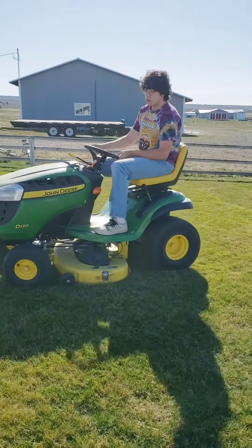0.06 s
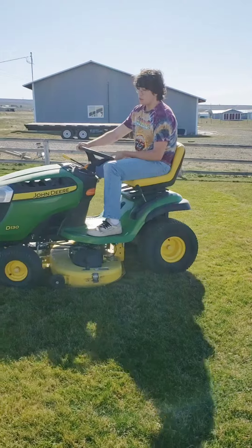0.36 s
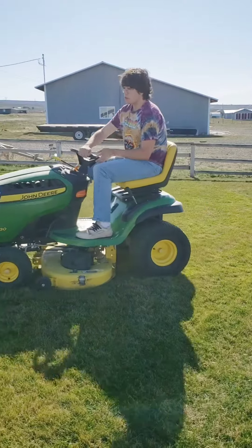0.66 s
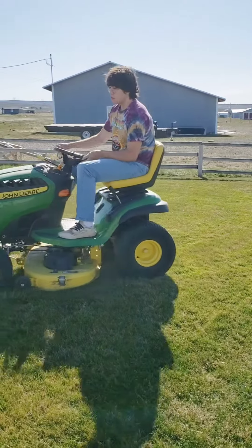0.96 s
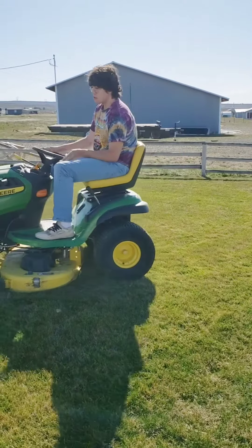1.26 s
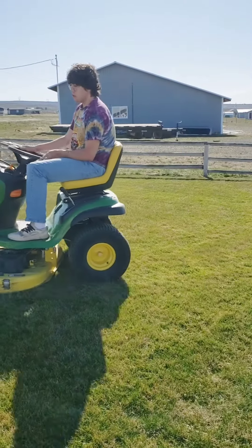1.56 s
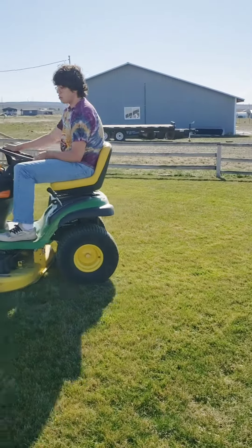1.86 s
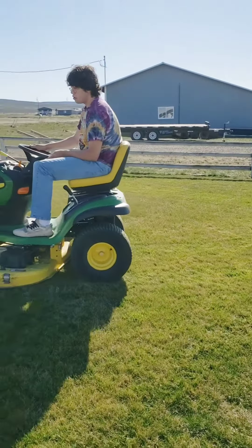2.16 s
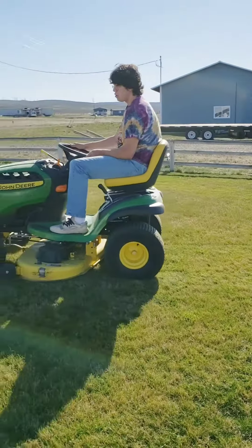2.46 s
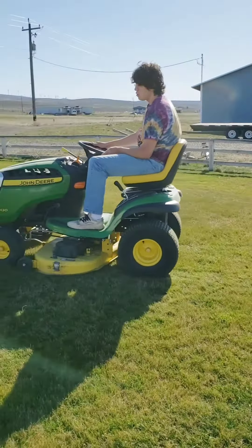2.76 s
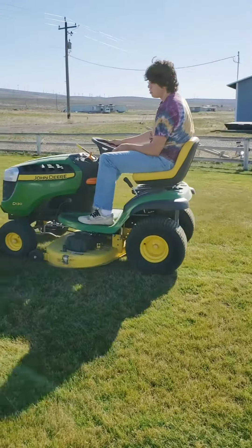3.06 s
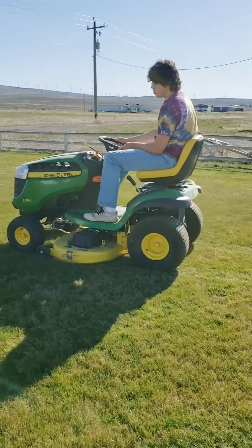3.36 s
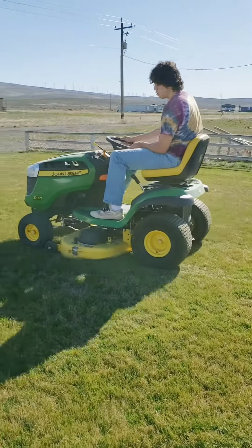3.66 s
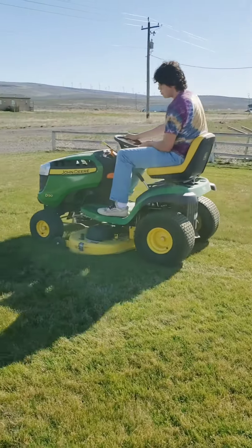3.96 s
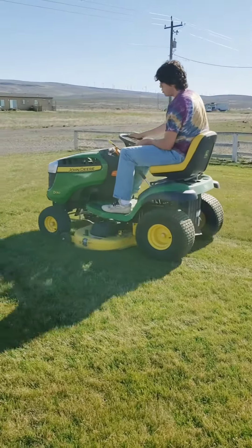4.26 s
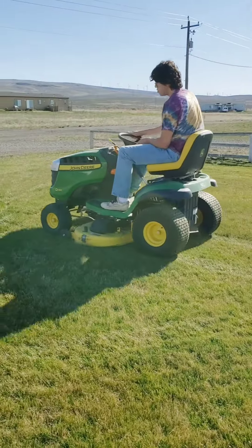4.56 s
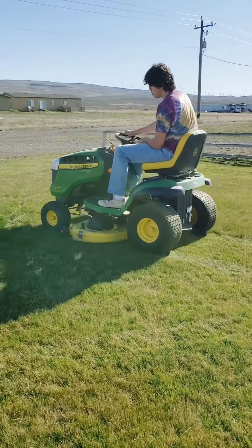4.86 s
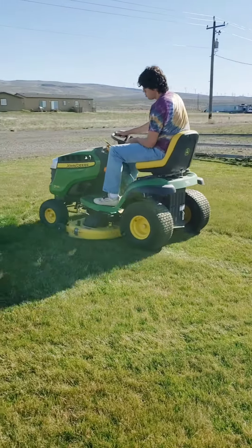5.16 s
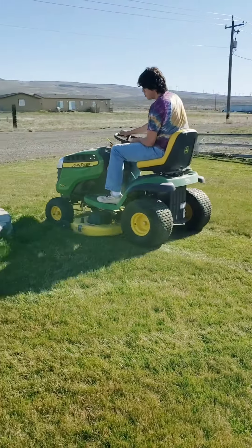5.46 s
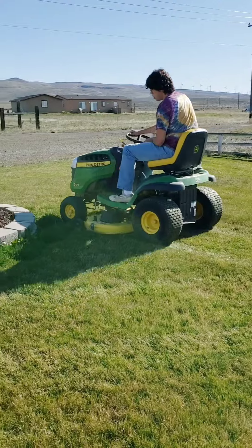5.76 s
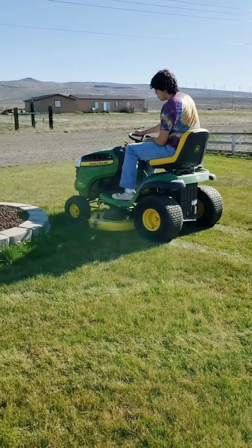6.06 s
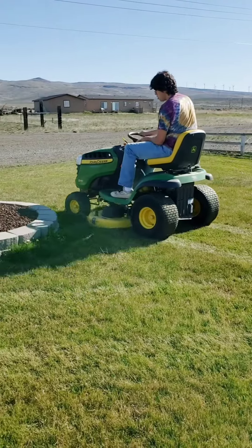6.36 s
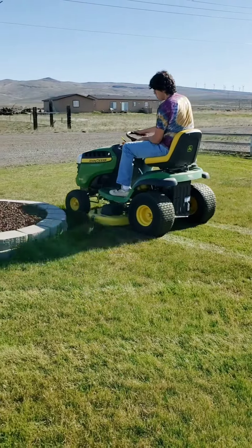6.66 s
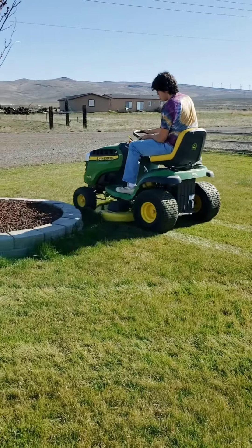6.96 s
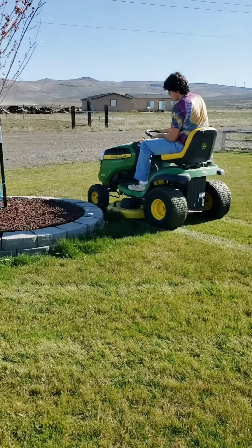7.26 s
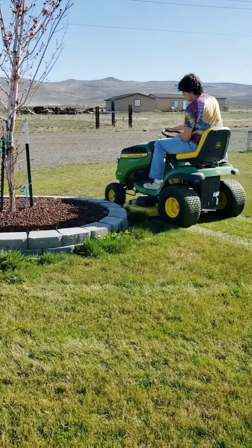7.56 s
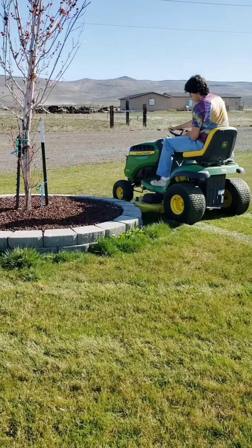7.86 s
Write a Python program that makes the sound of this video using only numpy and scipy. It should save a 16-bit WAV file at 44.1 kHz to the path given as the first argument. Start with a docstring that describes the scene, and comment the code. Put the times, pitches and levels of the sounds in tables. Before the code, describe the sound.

A riding lawn mower drones steadily with whirring blades, passing close by and slowly growing a little quieter as it moves away.

```python
"""A lumpy engine drone beats against the hum of blades: a V-twin riding mower passes on an open lawn,
then turns away. Uneven pressure pulses drive the muffler's harmonics; the belt-driven blades add
a second series. Turbulence makes the deck rumble and roar, the fan whirr and the blade tips hiss,
while vanes and gears whine and the chassis squeaks faintly by stick-slip friction.
Distance lowers the level, and single bands swell or sink for a moment as the mower passes."""
import sys
import numpy as np
from scipy import signal
from scipy.fft import rfft, irfft
from scipy.io import wavfile
from scipy.ndimage import uniform_filter1d, map_coordinates

SR = 44100
rng = np.random.default_rng(int(sys.argv[2]) if len(sys.argv) > 2 else 0)


def digitize_waveform(pressure):
    """Quantize a signal to 16-bit integers and store it at the path in sys.argv[1].

    Rows of a 2-D input are taken as channels; values are limited to [-1, 1].
    """
    field = np.atleast_2d(pressure).T
    bounded = np.clip(field, -1, 1)
    quanta = np.round(bounded * 32767).astype(np.int16)
    wavfile.write(sys.argv[1], SR, quanta)


N = 353682
TIME = np.arange(N) / SR
BIN_HZ = np.maximum(np.arange(N // 2 + 1) * SR / N, 1)


def undb(db):
    """Amplitude ratio of a level in decibels."""
    return 10 ** (np.asarray(db) / 20)


def unit(x):
    """Normalisation to rms 1."""
    return x / np.sqrt(np.mean(x ** 2))


def curve(table):
    """Linear interpolation of (time_s, value) rows at every sample."""
    return np.interp(TIME, *np.transpose(table))


def spectra(table):
    """Interpolation of each column over log frequency, one value per bin."""
    hz, *columns = np.transpose(table)
    return np.array([np.interp(np.log(BIN_HZ), np.log(hz), c) for c in columns])


def bell(offset, spread):
    """Gaussian window of height 1."""
    return np.exp(-.5 * (offset / spread) ** 2)


def wander(rate_hz):
    """Low-pass noise of rms 1 that changes about rate_hz times a second."""
    hold = int(SR / rate_hz)
    steps = np.repeat(rng.standard_normal(N // hold + 1), hold)
    return unit(uniform_filter1d(uniform_filter1d(steps, hold), hold)[:N])


def spreading(near_db, doubling_db, nearest_s=0.6, nearest_m=1.92, speed_m_s=0.6):
    """Spreading loss: the level in dB falls by doubling_db per doubling of distance."""
    distance_m = np.hypot(nearest_m, speed_m_s * (TIME - nearest_s))
    return near_db - doubling_db * np.log2(distance_m / nearest_m)


def directivity(lobes):
    """Directivity: gain in dB as the exhaust or deck opening turns past the listener."""
    return sum(db * bell(TIME - centre_s, spread_s) for centre_s, spread_s, db in lobes)


def cavity_lag(hz, centre_hz, width_hz):
    """Phase lag of a driven resonator in radians, taken as zero at resonance."""
    return np.arctan((hz ** 2 - centre_hz ** 2) / (hz * width_hz))


def throb(cycles, phase, depth_db):
    """Amplitude modulation: one swell per engine cycle."""
    return undb(depth_db * np.cos(2 * np.pi * (cycles - phase)))


# Governed engine speed, in four-stroke cycles: time_s, cycle_hz
ENGINE_SPEED = [(0.0, 22.783), (0.22, 22.723), (0.6, 22.889), (1.18, 22.758), (1.85, 22.771),
                (2.26, 23.089), (2.79, 22.769), (2.99, 22.558), (4.49, 22.677), (4.99, 22.919),
                (5.4, 22.765), (5.96, 22.848), (6.24, 22.688), (6.7, 22.627), (7.36, 22.827), (8.0, 22.73)]

def engine_cycles():
    """Phase as the integral of frequency: engine cycles elapsed at each sample."""
    return np.cumsum(curve(ENGINE_SPEED)) / SR


# Main pressure pulses of one cycle, negative for suction, which give the drone its lumpy chug:
# phase_cycles, strength
PRESSURE_PULSES = [(.136, .61), (.527, .46), (.814, -.94), (.947, -1.08)]
# Muffler harmonics: cycle_multiple, relative_db
MUFFLER_HARMONICS = [(1, -44), (2, -12), (3, -10.5), (4, -16), (5, -0.5), (6, -7.5), (7, -8), (8, 0.95),
                     (9, -7.5), (10, -12), (11, -8.5), (12, -27.5), (13, -17), (14, -18.5), (15, -32.5),
                     (16, -19.5), (17, -25), (18, -43), (19, -35), (21, -32.5)]
# Lobes of the exhaust's boom and of its bark: centre_s, spread_s, gain_db
BOOM_LOBES = [(0.2, 0.68, -2.5), (2.45, 0.44, 2), (6.3, 0.38, 1)]
BARK_LOBES = [(.85, 0.26, 4.5), (4.9, 0.73, -5.5), (6.1, 0.34, 2.5)]

def engine_drone(cycles, jitter_cycles=0.00062, right_bias_db=0.77):
    """Fourier series: uneven pressure pulses set the phases, the muffler the levels."""
    pulse_phase, strength = np.transpose(PRESSURE_PULSES)
    cycle_hz = cycles[-1] / TIME[-1]
    angle = 2 * np.pi * (cycles + jitter_cycles * wander(30))
    low_db = spreading(-27, 3.5)  # long waves radiate evenly in all directions
    boom_db = spreading(-29, 2.35) + directivity(BOOM_LOBES)
    bark_db = spreading(-27.5, 4.6) + directivity(BARK_LOBES)
    drone = 0
    for k, db in MUFFLER_HARMONICS:
        coefficient = np.sum(strength * np.exp(-2j * np.pi * k * pulse_phase))
        lag = cavity_lag(k * cycle_hz, centre_hz=65, width_hz=19)
        band_db = low_db if k < 6 else bark_db if 10 <= k < 15 else boom_db
        drone += undb(db + band_db) * np.cos(k * angle + np.angle(coefficient) - lag)
    balance = undb([[-right_bias_db / 2], [right_bias_db / 2]])
    return np.sqrt(2) * drone * undb(0.14 * wander(45)) * balance


# Blade harmonics: spindle_multiple, relative_db
BLADE_HARMONICS = [(2, 2), (3, -13.5), (4, 1.5), (5, -10), (6, -6), (8, -15.5), (10, -17.5)]
# Gain of the blade-passing tone and of its octave: time_s, gain_db
HUM_GAIN = [(0, -36), (0.45, -35), (.9, -32), (1.5, -33.7), (2.15, -32), (2.95, -37), (3.55, -34),
            (4.2, -36), (5.15, -38.5), (5.6, -35.7), (6.2, -42.5), (7.05, -52), (7.5, -36), (8.0, -47)]
OCTAVE_GAIN = [(0.25, -42), (0.7, -34.5), (1.5, -35.5), (2.1, -32.5), (3.05, -34), (3.5, -37.5), (4.1, -33),
               (4.9, -37), (5.5, -40), (6.2, -34), (6.65, -45), (7.4, -60), (7.9, -35)]

def blade_hum(cycles, turns_per_cycle=1.7419, slip_turns=0.0041):
    """Blade-passing tone: two wings pass per spindle turn, on a belt that slips a little."""
    spindle_turns = turns_per_cycle * cycles + .088
    spindle_hz = (spindle_turns[-1] - spindle_turns[0]) / TIME[-1]
    angle = 2 * np.pi * (spindle_turns + slip_turns * wander(2.87))
    firm_db = {2: curve(HUM_GAIN), 4: curve(OCTAVE_GAIN)}
    overtone_db = spreading(-36, 4)
    hum = 0
    for k, db in BLADE_HARMONICS:
        level_db = db + firm_db.get(k, overtone_db)
        flutter_db = (.6 if k in firm_db else 2.5) * wander(6)
        lag = cavity_lag(k * spindle_hz, centre_hz=115, width_hz=60)
        hum += undb(level_db + flutter_db) * np.cos(k * angle - lag)
    return np.sqrt(2) * hum


# Sound field at the two microphone ports: frequency_hz, left_lead_rad, coherence
STEREO_FIELD = [(60, -0.5, 1), (287, 0.43, 0.98), (394, 0.8, 1), (500, 1.5, 0.96), (605, 0.54, 0.9),
                (850, 0.19, 1), (1290, 1.5, 0.75), (1550, 0.31, 0.97), (2390, 1.36, 0.96), (3080, 3, 0.45),
                (4530, 5, 0.33), (6600, 8.5, 0), (14000, 19, 0)]

def radiate(force, body):
    """Source and filter: a body colours the force; scattering lowers stereo coherence in the treble."""
    lead_rad, coherence = spectra(STEREO_FIELD)
    sides = np.array([[1], [-1]])
    direct = np.sqrt(1 + coherence) * rfft(force)
    scattered = np.sqrt(1 - coherence) * rfft(rng.standard_normal(N)) * sides
    low_hz, high_hz = body[0][0], body[-1][0]
    skirts = np.minimum(1, np.minimum(BIN_HZ / low_hz, high_hz / BIN_HZ)) ** 2
    response = skirts * undb(spectra(body)) * np.exp(.5j * lead_rad * sides)
    return unit(irfft((direct + scattered) * response, N))


# Spectral shape of the air under the deck: frequency_hz, left_db, right_db
RUMBLE_SPECTRUM = [(18, -17, -17), (36, -18, -17), (75, -0.5, -1.5), (130, -2.5, -2.5), (225, 3, 5),
                   (301, -4, -1), (397, -16.5, -4), (510, -13, -35), (800, -47, -53)]
# Lobes of the deck opening: centre_s, spread_s, gain_db
RUMBLE_LOBES = [(2.8, 0.7, 0.94), (4.9, 0.91, -0.81), (7.5, 0.32, -0.49)]

def air_rumble(cycles):
    """Turbulence: air churned under the deck makes low noise that throbs with the engine."""
    churn = radiate(rng.standard_normal(N), RUMBLE_SPECTRUM)
    level_db = spreading(-35, 1.34) + directivity(RUMBLE_LOBES)
    return churn * throb(cycles, phase=0.86, depth_db=2) * undb(level_db)


def crank_jolts(cycles, phase=.55, spread_db=2, decay_s=0.0048):
    """Impact excitation: each crank turn, two to a cycle, jolts the loose deck into a noise burst."""
    onsets = np.diff(np.floor(2 * (cycles - phase)), prepend=np.floor(-2 * phase)) > 0
    impulses = onsets * undb(spread_db * np.clip(rng.standard_normal(N), -2, 2))
    envelope = signal.lfilter([1], [1, -np.exp(-1 / (decay_s * SR))], impulses)
    return unit(envelope * rng.standard_normal(N))


def turbulence(cycles, locked_share, renew_s=0.9):
    """Cyclostationary noise: a share of the power repeats each cycle, in a slowly renewed pattern."""
    cycle_samples = int(N / cycles[-1])
    patterns = rng.standard_normal((int(TIME[-1] / renew_s) + 3, cycle_samples))
    position = [TIME / renew_s, cycles % 1 * cycle_samples]
    locked = unit(map_coordinates(patterns, position, order=3, mode="grid-wrap"))
    return np.sqrt(locked_share) * locked + np.sqrt(1 - locked_share) * rng.standard_normal(N)


# Response of the steel deck: frequency_hz, left_db, right_db
DECK_RESPONSE = [(300, -6, -11), (450, -9, -3.5), (569, -1.5, -25), (621, 1.5, -6), (765, 0, -2),
                 (900, 0, -1), (933, -10.5, -0.5), (1207, -4, -7), (1333, -10, -10.5), (1690, -39, -45)]

def deck_roar(cycles, jolts, surge_db):
    """Forced vibration: turbulence and jolts drive the broad resonances of the deck."""
    force = turbulence(cycles, locked_share=0.29) + undb(-9) * jolts
    return radiate(force, DECK_RESPONSE) * undb(spreading(-36, 3.93) + surge_db)


# Response of the cooling fan and engine shroud: frequency_hz, left_db, right_db
SHROUD_RESPONSE = [(1160, -13.5, -22), (1480, 4, -15), (1576, -1, 0.5), (1790, -1, 1.6), (1880, -2, -3.5),
                   (2160, -3.5, 2.5), (2410, -4.5, 0.5), (2584, -8, -8), (3220, -29, -31)]

def fan_whirr(cycles, jolts, surge_db):
    """Flow-induced vibration: cooling air and faint jolts ring the shroud."""
    force = turbulence(cycles, locked_share=0.31) + undb(-13.5) * jolts
    whirr = radiate(force, SHROUD_RESPONSE) * throb(cycles, phase=0.12, depth_db=0.7)
    return whirr * undb(spreading(-41, 2.86) + 0.99 * surge_db + 0.76 * wander(30))


def grit(count=520, low_hz=4000, high_hz=13500, spread_db=2.5, tick_s=.0003, ring_s=.003):
    """Damped free vibration: soil and loose fittings hit steel, from dry ticks to short pings."""
    pings = np.zeros(N)
    t = np.arange(0, .04, 1 / SR)
    for when, pitch, size, ringing in rng.random((count, 4)):
        hz = low_hz + pitch * (high_hz - low_hz)
        size_db = spread_db * min(-np.log(1 - size), 3)  # most are tiny
        decay_s = tick_s * (ring_s / tick_s) ** ringing
        peak = undb(size_db) * np.sqrt(ring_s / decay_s)  # energy is independent of decay time
        span = int(when * (N - len(t))) + np.arange(len(t))
        pings[span] += peak * np.exp(-t / decay_s) * np.sin(2 * np.pi * hz * t)
    return pings


def peaking_filter(x, hz, width_hz, gain_db):
    """A second-order resonator lifts or dips one band."""
    band = signal.lfilter(*signal.iirpeak(hz, hz / width_hz, fs=SR), x)
    return x + (undb(gain_db) - 1) * band


# Spectral shape of air and grass off the blade tips: frequency_hz, left_db, right_db
HISS_SPECTRUM = [(2130, -17, -19), (2860, 0.5, -2), (3580, 1.5, -5.5), (4200, -1.3, -7), (5170, -4.5, -8),
                 (6050, -5, -13), (7000, -9, -47), (8200, -10, -20.5), (9500, -9, -12), (12100, -9, -10.5),
                 (13600, -7.5, -17), (14600, -18, -19)]
# Narrow modes of the sheet steel: centre_hz, width_hz, gain_db
PANEL_MODES = [(3280, 45, 2), (3750, 64, 1.5), (3950, 90, 2.5), (4150, 70, -2.5), (4250, 50, 4),
               (4450, 50, 4), (4780, 50, 2), (5300, 50, 3.5)]

def tip_hiss(cycles, shadow_hz=7500):
    """Aerodynamic noise and grit, coloured by steel; the leaving machine shadows the top most."""
    spray = turbulence(cycles, locked_share=0.11) + undb(-8) * grit()
    air = radiate(spray, HISS_SPECTRUM)
    for hz, width_hz, gain_db in PANEL_MODES:
        air = peaking_filter(air, hz, width_hz, gain_db)
    from_chuff = (cycles - 0.2 + .5) % 1 - .5  # the valve gear chuffs once a cycle
    chuff_db = 1.5 * bell(from_chuff, spread=.08)
    air = unit(air * undb(chuff_db)) * undb(0.58 * wander(15))
    top = signal.sosfiltfilt(signal.butter(2, shadow_hz, "high", fs=SR, output="sos"), air)
    return (air - top) * undb(spreading(-46.5, 2.14)) + top * undb(spreading(-42.5, 3.76))


# Tones of the fan vanes and gears: cycle_multiple, relative_db
WHINE_HARMONICS = [(29, -.5), (32, -5), (34, -2.5), (37, -5), (54, -6.5), (63, -15), (76, -4), (81, -6.5)]

def gear_whine(cycles, flutter_db=3, wobble_rad=0.88):
    """Vane-passing and gear-mesh tones, locked to the crank and fluttering in the moving air."""
    field_hz, lead_rad, _ = np.transpose(STEREO_FIELD)
    cycle_hz = cycles[-1] / TIME[-1]
    whine = 0
    for k, db in WHINE_HARMONICS:
        stereo_rad = np.interp(k * cycle_hz, field_hz, lead_rad) * np.array([[.5], [-.5]])
        gain = undb(db + flutter_db * wander(7))
        angle = 2 * np.pi * (k * cycles + rng.random()) + wobble_rad * wander(12)
        whine += gain * np.cos(angle + stereo_rad)
    return np.sqrt(2) * whine * undb(spreading(-54, 3.3))


# Bands of the mower's drone and roar that swell or sink for a moment as it passes:
# centre_s, spread_s, centre_hz, width_hz, gain_db
BAND_SWELLS = [(2, 1.2, 68, 8, 2), (7, 0.21, 159, 9, 8), (4, 1.9, 182, 12, 0.7), (3, 1.3, 84, 7.6, -4),
               (8, 2.1, 95, 13, 5.5), (5, 2.2, 150, 11, 0.5), (4, 0.64, 205, 5.7, -2),
               (5, 0.29, 1860, 52, 5), (4.85, .45, 630, 90, 2.5), (6.5, 0.81, 250, 16, 1),
               (3.5, 0.41, 280, 34, -1), (10, .5, 228, 14, -5), (2.06, 0.64, 380, 120, 1.5),
               (3.5, 0.75, 368, 30, 4), (1.66, 0.96, 530, 120, 2.5), (4, 0.52, 675, 190, -2.5),
               (1, 0.4, 780, 640, -2.5), (1.5, 0.54, 1100, 1100, 1.7), (1, 0.26, 1740, 77, 0.5),
               (0.7, 0.32, 2040, 490, 2.5), (1.5, 1.5, 2710, 290, 3), (1, 1.1, 3930, 700, -3),
               (2, 1.2, 2075, 130, -7.5), (3.5, 1.6, 1110, 260, 2), (2, 0.37, 2400, 93, 1),
               (3.5, 1.5, 1850, 42, 5), (2.5, 0.21, 8700, 6500, 0.3), (5, 1, 1600, 47, 5.5),
               (7, 0.77, 4500, 120, 5.5), (6.2, 1.4, 2730, 350, -3), (3, 0.5, 600, 150, -2.5),
               (3.5, 0.64, 316, 50, 2), (0.5, .25, 1850, 64, 3), (8.5, .4, 690, 270, -1),
               (0, 0.4, 860, 500, -2), (6.5, 0.36, 340, 93, 2.5), (4.5, 0.22, 220, 12, -3),
               (0, .5, 137, 12, 1), (4, 1, 150, 12, 0.2), (7, 1, 1305, 150, -3), (7.2, 2, 1430, 58, 6.5)]

def swell_bands(x):
    """Time-varying filtering: each band swells or sinks for a moment, shifting the timbre."""
    for centre_s, spread_s, hz, width_hz, gain_db in BAND_SWELLS:
        x = peaking_filter(x, hz, width_hz, gain_db * bell(TIME - centre_s, spread_s))
    return x


# Squeaks of the seat and linkage: centre_s, pitch_hz, tone_db, scrape_db
SQUEAKS = [(.608, 8270, -60, -53), (.705, 8950, -55, -50), (.737, 5250, -57, -53), (.93, 3500, -60, -51),
           (1.281, 5510, -51, -55), (1.457, 7900, -56, -48.5), (1.634, 3160, -50, -51),
           (2.408, 3380, -52, -54), (2.651, 5130, -42.5, -49), (2.685, 8270, -54, -55),
           (2.84, 5500, -58, -62), (3.035, 5350, -55, -60), (3.32, 3900, -58, -49), (3.892, 5170, -48, -56),
           (3.965, 2700, -53, -56), (4.198, 5080, -51, -52), (4.255, 6290, -57, -55),
           (4.609, 12660, -58, -60)]

def chassis_squeaks(waver_hz=40, spread_s=.0095):
    """Stick-slip friction: short wavering tones, each with a dry scrape."""
    squeaks = np.zeros((2, N))
    t = np.arange(-.04, .04, 1 / SR)
    swell = bell(t, spread_s)
    detune_hz = waver_hz * wander(390)
    scrape_band = signal.butter(2, [2900, 9000], "band", fs=SR, output="sos")
    scrape = unit(signal.sosfilt(scrape_band, rng.standard_normal((2, N))))
    for centre_s, pitch_hz, tone_db, scrape_db in SQUEAKS:
        span = int((centre_s + t[0]) * SR) + np.arange(len(t))
        tone = np.sin(2 * np.pi * np.cumsum(pitch_hz + detune_hz[span]) / SR)
        squeaks[:, span] += swell * (undb(tone_db) * tone + undb(scrape_db) * scrape[:, span])
    return squeaks


def scene():
    """Superposition of the mower's sources, all but the squeaks timed by the engine cycle."""
    cycles = engine_cycles()
    drone = engine_drone(cycles)
    hum = blade_hum(cycles)
    rumble = air_rumble(cycles)
    surge_db = 0.64 * wander(13)  # bumps in the lawn shake deck and shroud together
    jolts = crank_jolts(cycles)
    roar = deck_roar(cycles, jolts, surge_db)
    whirr = fan_whirr(cycles, jolts, surge_db)
    hiss = tip_hiss(cycles)
    whine = gear_whine(cycles)
    return hum + swell_bands(drone + rumble + roar + whirr + hiss + whine) + chassis_squeaks()


def record(dry, cutoff_hz=14600):
    """Band limiting: a steep elliptic low-pass removes the highest treble."""
    return signal.sosfilt(signal.ellip(10, .1, 80, cutoff_hz, fs=SR, output="sos"), dry)


dry = scene()
out = record(dry)
digitize_waveform(out)
```